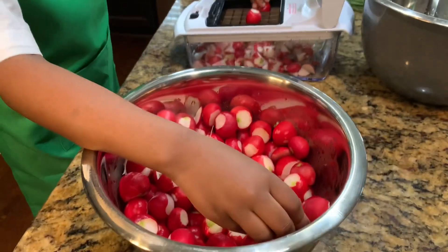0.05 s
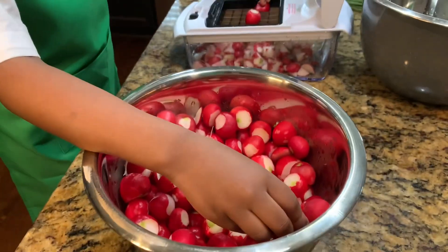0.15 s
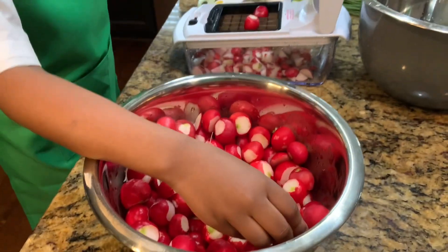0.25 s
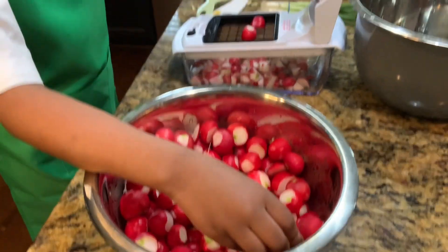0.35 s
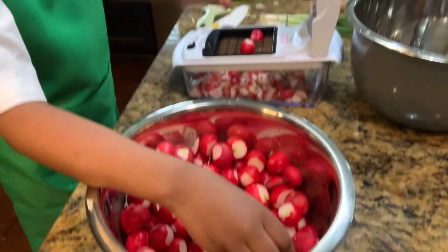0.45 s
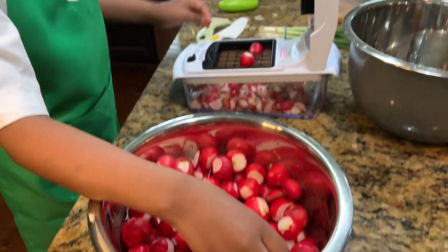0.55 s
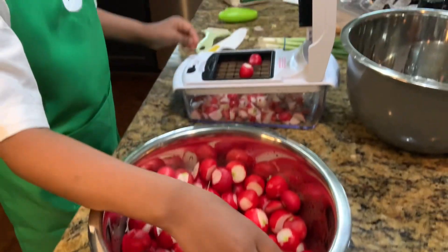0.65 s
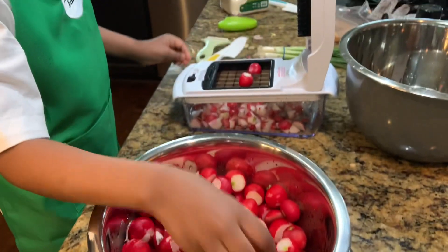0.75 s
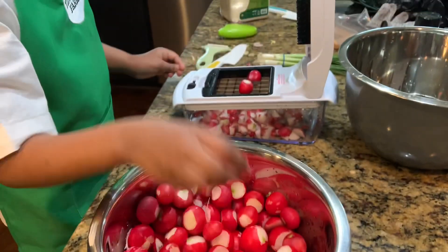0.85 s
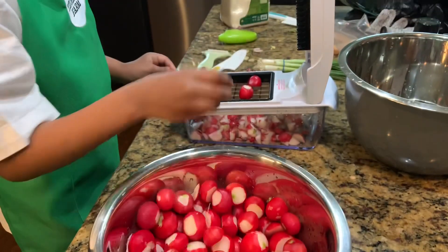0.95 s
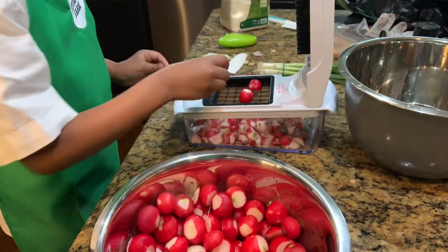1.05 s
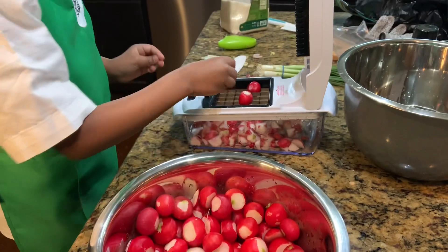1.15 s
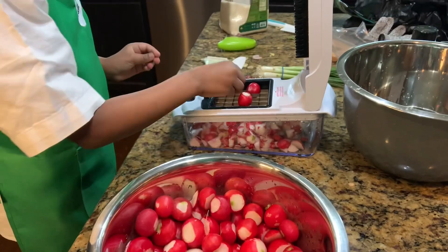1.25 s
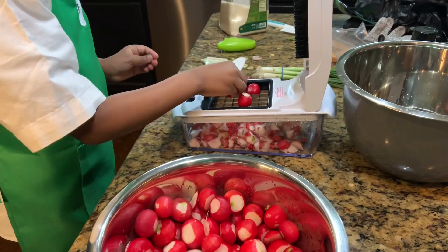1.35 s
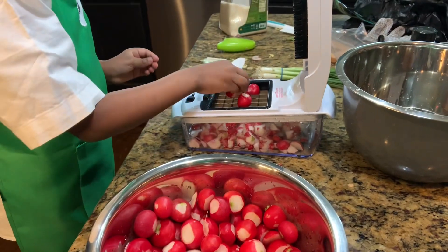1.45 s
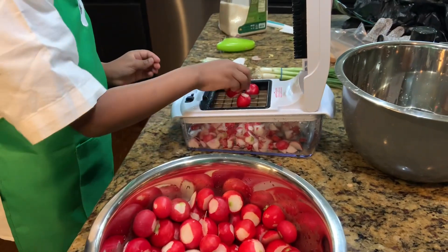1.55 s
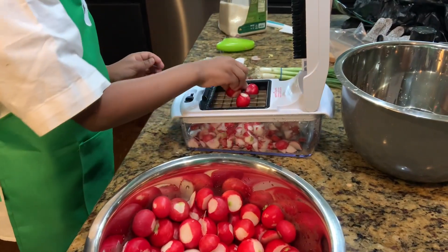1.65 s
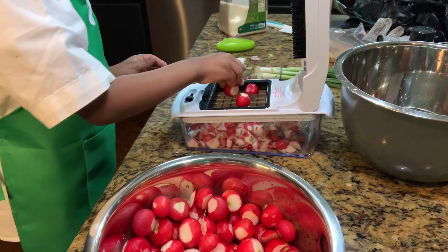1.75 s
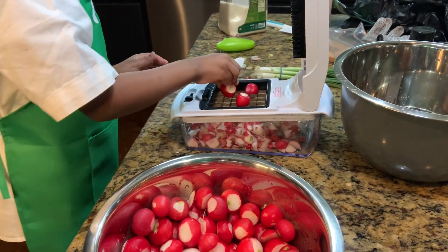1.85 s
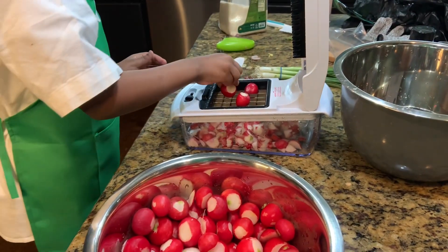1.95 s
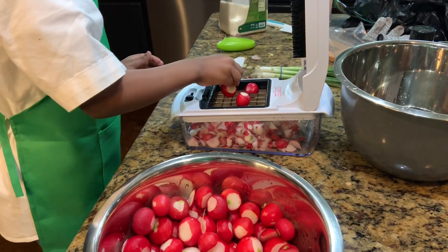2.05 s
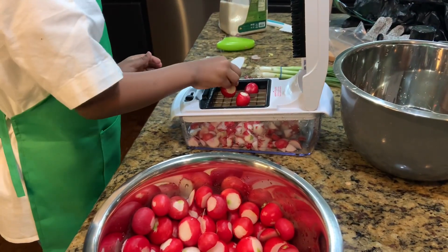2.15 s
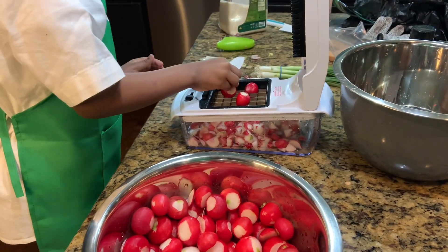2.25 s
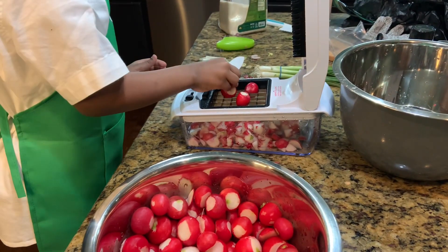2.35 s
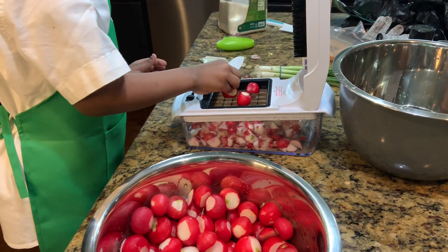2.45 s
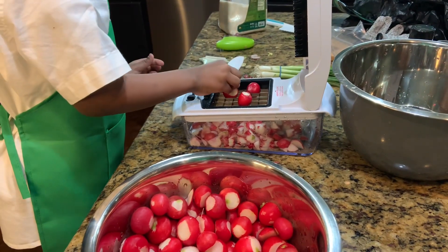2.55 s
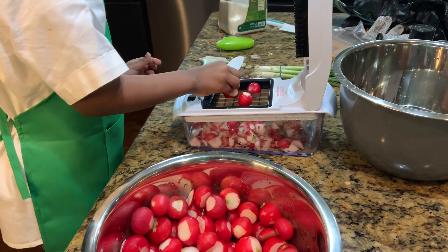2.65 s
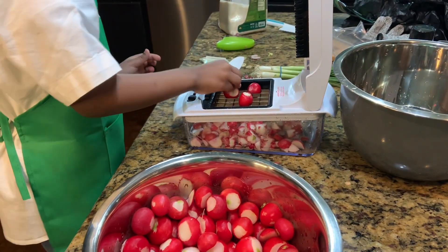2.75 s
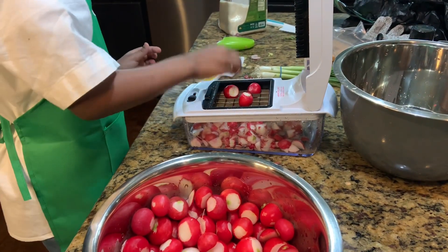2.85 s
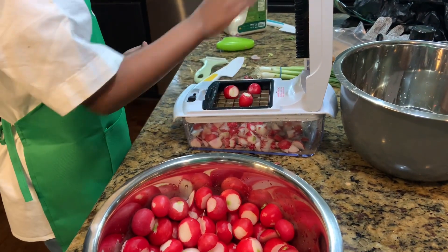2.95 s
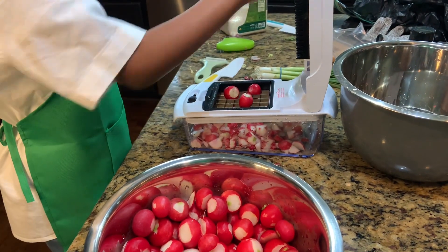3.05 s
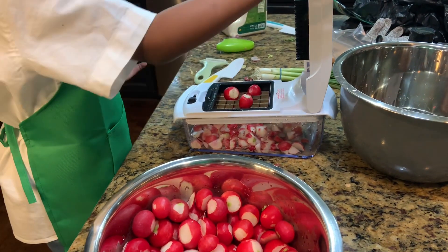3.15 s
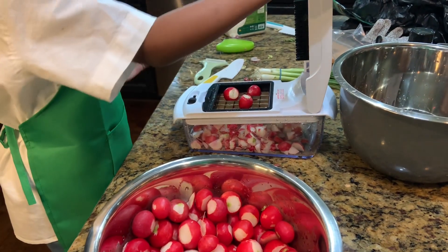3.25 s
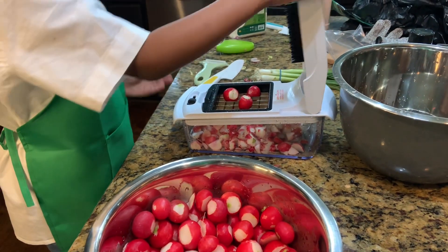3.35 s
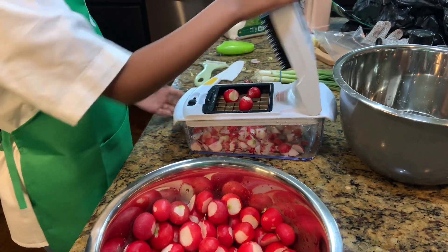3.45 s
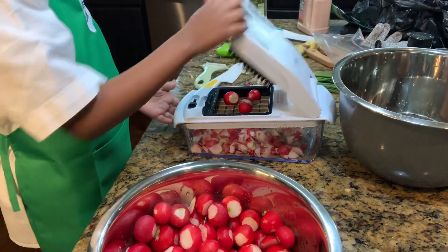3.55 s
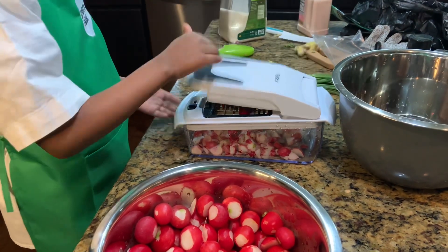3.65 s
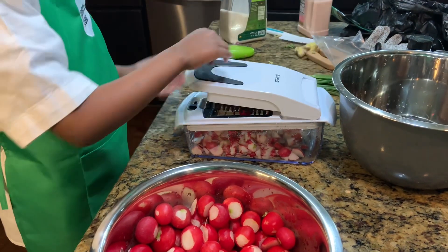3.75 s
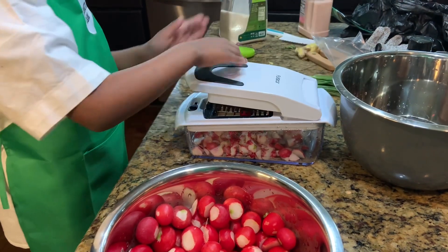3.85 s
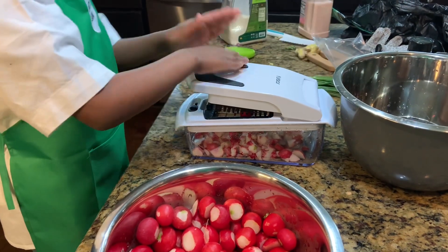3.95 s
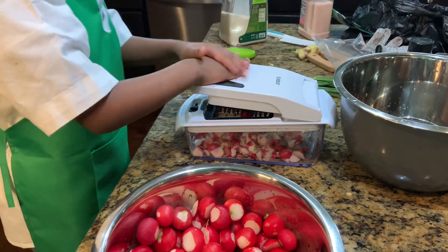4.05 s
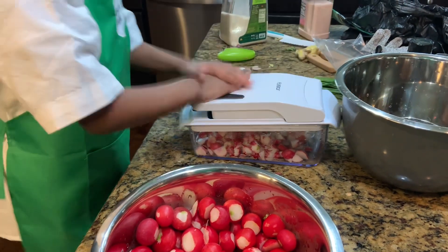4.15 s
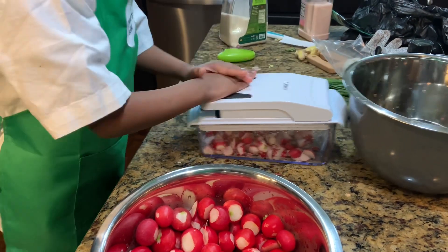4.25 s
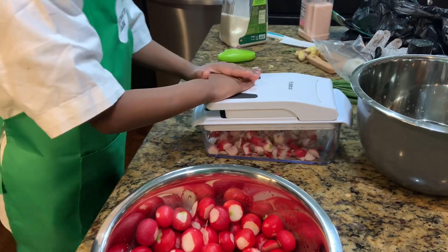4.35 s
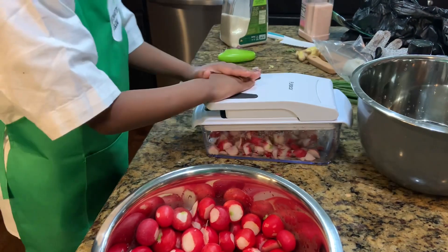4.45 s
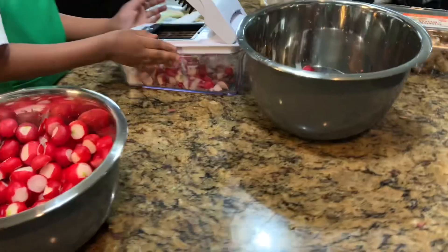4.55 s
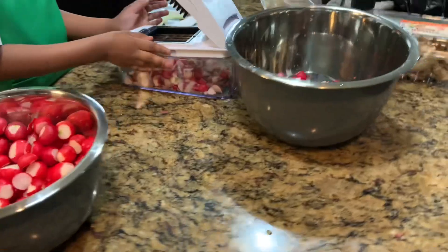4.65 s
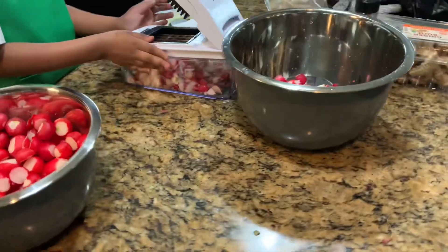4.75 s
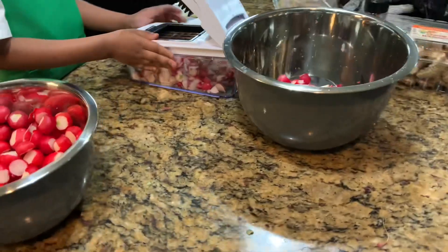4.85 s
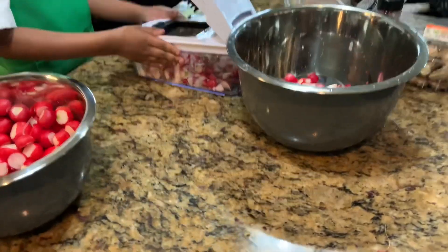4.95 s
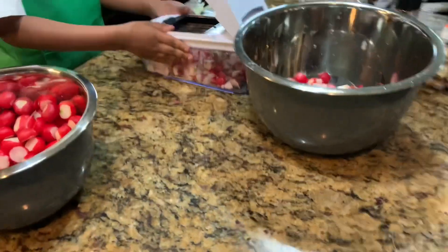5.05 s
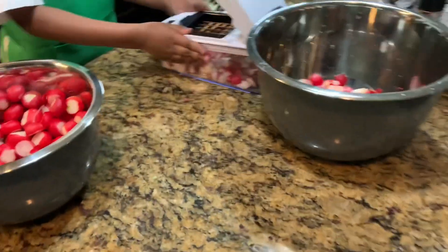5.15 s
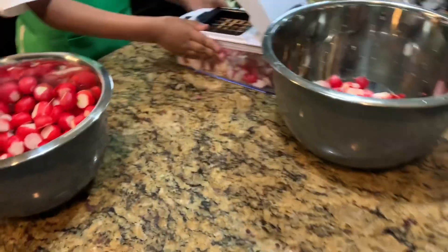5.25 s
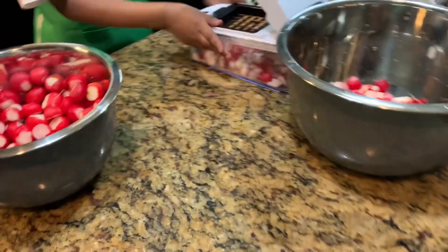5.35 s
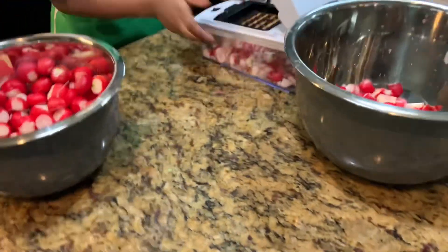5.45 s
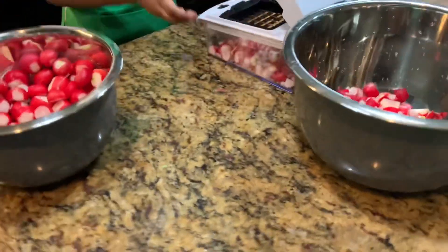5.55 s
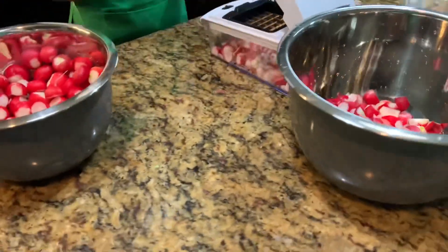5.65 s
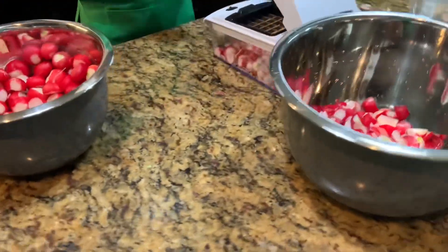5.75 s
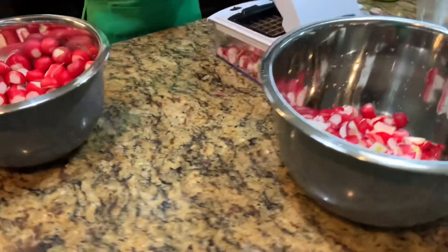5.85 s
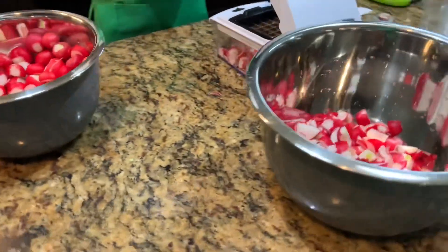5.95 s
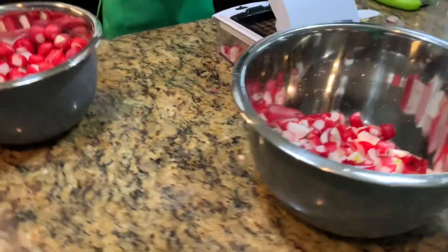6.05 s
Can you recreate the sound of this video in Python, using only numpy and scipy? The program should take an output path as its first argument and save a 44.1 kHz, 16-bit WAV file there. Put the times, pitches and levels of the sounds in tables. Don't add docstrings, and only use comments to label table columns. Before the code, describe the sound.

A quiet, hard-walled kitchen heard in close stereo, with a low, slightly unsteady fridge hum throughout. For the first 3.6 seconds there are only small sounds: sleeve rustle, faint fingernail ticks on a steel bowl near 0.7, a soft scrape over the blade grid, and dull radish taps around 1.3, 1.8, 2.1 and 3.2. At 3.66 the chopper's plastic lid drops with a hollow double clack. Light taps at 4.0 precede a palm landing at 4.11 and a sharp, cracking slam at 4.16 with a low counter thud; cut radish crackles and loose parts rattle. The sound cuts abruptly at 4.56 to the lid clattering open until 4.7. At 5.11 the box knocks loudly on stone, bounces and rocks in fading plastic rattles until 5.4. Soft rustle, a faint tap or two and hum remain to about 6.1.

```python
import sys
import numpy as np
from scipy import signal
from scipy.fft import rfft, irfft, next_fast_len
from scipy.io import wavfile
from scipy.ndimage import map_coordinates

SR = 44100
rng = np.random.default_rng(int(sys.argv[2]) if len(sys.argv) > 2 else 0)


def file_out(sig):
    cols = np.atleast_2d(sig).T
    lim = np.clip(cols, -1, 1)
    pcm = np.round(lim * 32767).astype(np.int16)
    wavfile.write(sys.argv[1], SR, pcm)


def makeup_ratio(level_db):
    decades = np.asarray(level_db, float) / 20
    return 10 ** decades


N = 268806
CUT_S = 4.561

# pitch_hz, width_hz, level_db
BOX = [(250, 120, -3), (430, 77, -0.5), (591, 100, -1.5), (780, 94, 0), (966, 99, -2.5), (1143, 81, -7),
       (1325, 50, -15), (1647, 58, -7), (1930, 174, -13)]
# pitch_hz, density_db (per Hz)
CRACK = [(500, -31), (1000, 2), (2000, -7), (4000, -3.5), (6500, -9.5), (9000, -7.5), (12000, -13.5),
         (16000, -13)]
# pitch_hz, likeness (-1 to 1)
ALIKE = [(60, 0.55), (130, 0.85), (290, 0.9), (640, 0.3), (1410, -0.034), (3100, 0.094), (6820, -0.27),
         (15000, 0.02)]


def unit(x):
    return x / np.sqrt(np.mean(x ** 2) + 1e-20)


def along(points, hz):
    f, v = np.transpose(points)
    return np.interp(np.log(hz + 1), np.log(f + 1), v)


def gains(tables):
    t = np.arange(N) / SR
    total = 0
    for table in tables:
        s, *columns = np.transpose(table)
        total = total + np.array([makeup_ratio(np.interp(t, s, db, -150, -150)) for db in columns])
    return total


def wobble(rate):
    knots = rng.standard_normal(int(N * rate / SR) + 4)
    return map_coordinates(knots, [np.arange(N) * rate / SR])


def filtered(x, response):
    m = next_fast_len(x.shape[-1] + 4096)
    spectrum = rfft(x, m) * response(np.fft.rfftfreq(m, 1 / SR))
    return irfft(spectrum, m)[..., :x.shape[-1]]


def modes(peaks):
    def response(f):
        total = 0
        for k, (centre, width, db) in enumerate(peaks):
            damping = 1j * f * width
            total = total + (-1) ** k * makeup_ratio(db) * damping / (centre * centre - f * f + damping)
        return total
    return response


def likeness_angle(hz):
    return np.arccos(np.clip(along(ALIKE, hz), -1, 1)) / 2


def diffuse(response, lumps=1):
    def spread(hz):
        angle = likeness_angle(hz)
        return response(hz) * np.array([np.cos(angle), np.sin(angle)])
    mid, side = filtered(lumps * rng.standard_normal((2, N)), spread)
    return unit(np.array([mid + side, mid - side]))


def room(x):
    # pitch_hz, t60_s
    wall_t60 = [(150, 0.82), (500, 0.57), (2000, 0.73), (6000, 0.49), (14000, 0.39)]
    hz, t, z = signal.stft(rng.standard_normal((2, SR // 5 * 2)), SR, nperseg=256)
    angle = likeness_angle(hz)[:, None]
    z = np.cos(angle) * z[0] + np.sin(angle) * z[1] * np.array([1, -1])[:, None, None]
    decay = makeup_ratio(-60 * t / along(wall_t60, hz)[:, None])
    tail = signal.istft(z * decay, SR, nperseg=256)[1]
    delayed = np.pad(x, ((0, 0), (200, 0)))
    return signal.fftconvolve(delayed, tail / np.linalg.norm(tail[0]), axes=1)


def contacts(rows, wet_db, knock_db):
    # pitch_hz, level_db
    shadow = [(2500, 0), (4200, -6.5), (5500, -4.5), (7000, 2)]
    out, t = np.zeros((2, N + 2 * SR)), np.arange(SR // 5) / SR
    for s, db, hz, crack_db, t60 in rows:
        t60 = max(t60, .005)
        ring = np.sin(2 * np.pi * hz * t) * makeup_ratio(-60 * t / t60) * (1 - np.exp(-t / 0.00054))

        struck = [(c, w, level + rng.normal(0, 1.1) - 2.5 * abs(np.log2(c / hz))) for c, w, level in BOX]
        knock = filtered(rng.standard_normal(len(t)) * makeup_ratio(-60 * t / (0.5 * t60)), modes(struck))

        edge_hz = 9000 * makeup_ratio(0.72 * crack_db)

        def crack_colour(f):
            colour_db = along(CRACK, f) + np.outer([1, 0], along(shadow, f))
            return makeup_ratio(colour_db) / (1 + 1j * f / edge_hz)

        crack = filtered(rng.standard_normal((2, len(t))) * makeup_ratio(-60 * t / 0.034), crack_colour)
        near = ring + makeup_ratio(knock_db) * knock / np.abs(knock).max()
        near = near + makeup_ratio(crack_db) * crack / np.abs(crack).max()
        near[1] = np.roll(near[1], 4)
        echo = room(near[1:, :SR // 12] - 0.27 * ring[:SR // 12])
        at = round(s * SR)
        out[:, at:at + len(t)] += makeup_ratio(db) * near
        out[:, at:at + echo.shape[1]] += makeup_ratio(db + wet_db) * echo
    return out[:, :N]


def swells(rows):
    swell_db, roundness = 25, 1.5
    out, t = np.zeros((len(rows[0]) - 3, N)), np.arange(N) / SR
    for t0, top, t1, db, *over_db in rows:
        end = min(t1, CUT_S) if top < CUT_S else t1
        span = slice(round(t0 * SR), round(end * SR))
        away = np.interp(t[span], [t0, top, t1], [1, 0, 1])
        layers_db = np.array([0, *over_db])[:, None]
        out[:, span] += makeup_ratio(db - swell_db * away ** roundness + layers_db)
    return out


def kitchen():
    # time_s, level_db
    hum = [(0.0, -59.5), (1.2, -59), (1.63, -63), (2.51, -60), (3.45, -60), (4.4, -58.5), (5.13, -67),
           (5.3, -60.5), (5.7, -68), (6.1, -65)]
    # pitch_hz, level_db
    fridge = [(120, 3), (167, -12.5), (335, -22.5), (505, -30.5)]
    # pitch_hz, density_db (per Hz)
    air = [(20, -17), (45, 7), (70, 6.5), (150, 1.5), (250, -7), (500, -16), (1000, -22.5), (2000, -31),
           (4000, -38.5), (8000, -40), (13000, -38), (16000, -50.5)]
    t, level = np.arange(N) / SR, gains([hum])[0]
    lines = 0
    for hz, db in fridge:
        unsteady = makeup_ratio(db + 0.91 * wobble(16))
        lines = lines + unsteady * np.sin(2 * np.pi * hz * t + 0.94 * wobble(1.3))
    drift_db = .9 * wobble(2.5) + 1.2 * wobble(11)
    return makeup_ratio(6.5) * level * lines + makeup_ratio(-58.0 + drift_db) * diffuse(lambda f: makeup_ratio(along(air, f)))


def rustle():
    # start_s, peak_s, end_s, hiss_db, body_over_hiss_db
    strokes = [(.1, .12, 0.17, -75, 2), (.66, .73, 0.82, -83, 10), (1.27, 1.3, 1.186, -70.5, 16),
               (1.3, 1.75, 2, -83.5, 3.5), (1.75, 1.81, 1.917, -72, 2), (2.03, 2.06, 2.2, -95.5, 30),
               (1.9, 2.45, 2.66, -74, 1), (2.75, 2.83, 2.82, -88, 22), (3.17, 3.19, 3.24, -80, 18),
               (3.28, 3.32, 2.4, -84, -3), (3.1, 3.45, 4.42, -78.5, 2), (3.56, 3.64, 3.3, -75, 6.5),
               (4.75, 5.03, 5.12, -76, 8), (5.2, 5.35, 5.7, -80, 25), (5.33, 5.37, 4.88, -58.5, 10),
               (5.35, 5.56, 5.62, -61.5, -6), (5.6, 5.73, 5.883, -67, -1.5), (5.75, 5.9, 6, -71, -0.5),
               (5.9, 6.07, 6.13, -75.5, 1)]
    # start_s, peak_s, end_s, level_db
    scrapes = [(.68, .73, 0.67, -67), (1.62, 1.82, 1.83, -72.5), (2.1, 2.38, 2.4, -79),
               (3.3, 3.46, 3.66, -85)]
    # pitch_hz, width_hz, level_db
    blades = [(2200, 110, 9), (3500, 360, -3), (4730, 220, -13), (6730, 290, -2.5)]
    # pitch_hz, density_db (per Hz)
    cloth = [(900, -18.5), (2200, 3), (2800, -4.5), (3500, -2), (5000, -5), (6500, -10), (9000, -3.5),
             (11000, -7.5), (15000, -10.5), (16500, -14)]
    hiss, body = swells(strokes)
    grain = makeup_ratio(1.8 * wobble(140))
    out = makeup_ratio(2.0) * hiss * diffuse(lambda f: makeup_ratio(along(cloth, f)), grain)
    out += swells(scrapes) * diffuse(modes(blades), grain)
    lumps = makeup_ratio(1.5 * wobble(40))
    handling = body + makeup_ratio(-75 + 2.5 * wobble(5))
    return out + makeup_ratio(0.5) * handling * diffuse(modes([(578, 350, 0), (1100, 620, 0)]), lumps)


def light_contacts():
    # start_s, peak_db, pitch_hz, crack_db
    taps = [(0.138, -39.5, 513, -27), (.767, -43, 205, -32), (1.262, -54, 464, -24),
            (1.293, -46.5, 482, -9), (1.829, -45, 490, -7.5), (2.054, -35, 630, -19),
            (2.126, -39.5, 510, -38), (2.746, -47, 1030, -15), (3.189, -40, 547, -38),
            (3.282, -49, 540, -24), (4.004, -29.5, 505, -21.5), (4.014, -33.5, 480, -22.5),
            (4.025, -36, 400, -25), (4.042, -39.5, 360, -23), (4.781, -53.5, 404, -21.5),
            (4.818, -51.5, 907, -16.5), (5.074, -35, 700, -24), (5.567, -46, 451, -8), (5.75, -53, 666, 4)]
    # start_s, peak_db, pitch_hz
    ticks = [(.700, -55, 1300), (0.709, -57, 1310), (0.729, -47.5, 1250), (0.832, -60.5, 1250)]
    light = [(*row, .028) for row in taps]
    light += [(*row, -4.5, 0.039) for row in ticks]
    return contacts(light, wet_db=-6.5, knock_db=-5.0)


def counter():
    # start_s, level_db
    thuds = [(.767, -39), (3.666, -17.5), (3.72, -24), (4.04, -38.5), (4.112, -29.5), (4.159, -9.5),
             (4.30, -30), (4.359, -26), (4.44, -28.5), (4.596, -28), (5.073, -30), (5.112, -18),
             (5.137, -27.5), (5.212, -46), (5.354, -33.5), (5.75, -50.5)]
    # pitch_hz, t60_s
    slab_modes = [(70, 0.17), (98, 0.033)]
    out, t = np.zeros(N + SR), np.arange(SR // 5) / SR
    late = (1 - np.exp(-t / .017)) ** 3
    shake = sum(np.sin(2 * np.pi * hz * t) * makeup_ratio(-60 * t / t60) for hz, t60 in slab_modes) * late
    for s, db in thuds:
        out[round(s * SR):][:len(t)] += makeup_ratio(db + 9) * shake
    return out[:N]


def presses():
    # start_s, end_s, final_db, rise_db
    loads = [
        (3.643, 3.658, -40.5, 30),
        (4.125, 4.155, -20, 29.5),
        (4.572, 4.593, -39, 8),
        (5.068, 5.112, -31.5, 32.5),
        (5.349, 5.37, -51, 1),
    ]
    ramps = [[(t0, db - rise_db), (t1, db), (t1 + 0.0066, db - 23)] for t0, t1, db, rise_db in loads]
    grit = makeup_ratio(1.7 * wobble(500))
    crackle = diffuse(lambda f: makeup_ratio(along(CRACK, f)), grit)
    return gains(ramps)[0] * (crackle + makeup_ratio(-3) * diffuse(modes(BOX), grit))


def blows():
    # start_s, peak_db, pitch_hz, crack_db, ring_t60_s
    lid = [(3.662, -12, 978, -8, 0.025), (3.663, -19.5, 2160, -4.5, 0.025), (3.665, -9, 427, -5.5, 0.019),
           (3.667, -15, 334, -12, 0.026), (3.673, -16, 395, -10, 0.065), (3.70, -30, 154, -4, 0.047),
           (3.722, -20, 399, -15, 0.034), (3.762, -30, 165, -15, 0.021), (3.818, -39.5, 392.5, -25.5, 0.27)]
    slam = [(4.113, -19.5, 580, -13, 0.052), (4.157, -19.5, 6270, 14, 0.038), (4.160, -8, 780, 8, 0.023),
            (4.163, -16, 623, 4.5, 0.022), (4.164, -11, 247, -3, 0.032), (4.168, -19, 130, -9.5, 0.1),
            (4.205, -20.5, 780, -10.5, 0.03)]
    opening = [(4.564, -32, 452, -0.5, 0.07), (4.579, -29.5, 901, -9, 0.15),
               (4.595, -20.5, 1100, -4.5, 0.026), (4.599, -20, 450, -11, 0.031),
               (4.613, -25, 915, -7, 0.052), (4.633, -30, 438, -4, 0.05), (4.67, -39, 497, -15, .06),
               (4.73, -38.5, 439.4, -22.5, 0.065)]
    stone_knock = [(5.107, -10, 430, -24.5, 0.039), (5.110, -8, 450, -15, 0.047),
                   (5.113, -5, 525, -2.5, 0.02), (5.112, -19, 770, -24, 0.11), (5.127, -21, 794, 2, 0.065),
                   (5.134, -20.5, 98.5, -21.5, 0.066), (5.141, -13.5, 415, -2.5, 0.05),
                   (5.159, -13, 467, -1.5, .045)]
    # start_s, peak_db, pitch_hz
    rocks = [(5.150, -32, 780), (5.182, -22.5, 459), (5.212, -25, 460), (5.23, -32, 815), (5.25, -36, 616),
             (5.272, -35.5, 476), (5.30, -40, 690), (5.325, -37.5, 431), (5.35, -30, 476),
             (5.376, -28, 442)]
    crack_db, ring_cycles = -11, 35
    rocking = [(s, db, hz, crack_db, ring_cycles / hz) for s, db, hz in rocks]
    return contacts(lid + slam + opening + stone_knock + rocking, wet_db=-7, knock_db=-5.5)


def tumble():
    # start_s, peak_s, end_s, walls_db, hollow_over_walls_db
    loose = [(3.68, 3.9, 4.4, -62, -1), (4.1, 4.21, 4, -50, -8.5), (4.05, 4.44, 4.88, -39.5, -7),
             (4.55, 4.59, 4.91, -46, -1), (4.7, 5.05, 5.12, -63, -0.5), (5.12, 5.24, 5.24, -48, -2.5),
             (5.2, 5.52, 5.82, -62.5, 5.5)]
    # start_s, peak_s, end_s, level_db
    pieces = [(4.09, 4.12, 4.25, -50.5), (4.1, 4.3, 8, -49), (4.15, 4.42, 4.97, -45),
              (4.55, 4.6, 4.792, -47), (4.6, 4.8, 5.28, -68), (5.11, 5.138, 5.21, -39),
              (5.15, 5.2, 4.8, -58), (5.3, 5.5, 5.88, -62.5), (3.7, 3.85, 3, -73)]
    # start_s, peak_s, end_s, level_db
    leaning = [(3.66, 3.7, 3.73, -40), (4.0, 4.06, 4.12, -59.5), (4.2, 4.37, 4.47, -44),
               (4.56, 4.59, 4.74, -46), (5.1, 5.2, 5.3, -56.5), (5.28, 5.34, 5.4, -50)]
    # pitch_hz, density_db (per Hz)
    crunch_colour = [(500, -32), (1100, 2.5), (2000, -2), (4000, -3), (7000, -11.5), (9000, -12.5),
                     (12000, -28.5), (16000, -35.5)]
    walls, hollow = swells(loose)
    crunch, slab = swells(pieces)[0], swells(leaning)[0]
    bursts = 3 * wobble(90)
    out = makeup_ratio(-2.5) * hollow * diffuse(modes(BOX[:2]), makeup_ratio(bursts))
    out += makeup_ratio(-2.0) * walls * diffuse(modes(BOX[2:]), makeup_ratio(bursts))
    crumbs = makeup_ratio(.6 * bursts + 0.83 * wobble(400))
    out += makeup_ratio(3.5) * crunch * diffuse(lambda f: makeup_ratio(along(crunch_colour, f)), crumbs)
    return out + makeup_ratio(6.0) * slab * diffuse(modes([(66, 54, 0)]))


def scene():
    return kitchen() + rustle() + light_contacts() + counter() + presses() + blows() + tumble()


def band_limit(x):
    return signal.sosfilt(signal.butter(12, 16650, fs=SR, output="sos"), x)


def record(dry):
    def share(hz):
        return np.clip((hz - 3500) / 3800, 0, 1)

    def turned(hz):
        return share(hz) * np.exp(2j * np.pi * (hz - SR / 4) * 9 / SR)

    right = filtered(dry[1], lambda hz: np.sqrt(1 - share(hz) ** 2)) + filtered(dry[0], turned)

    left_s = CUT_S - np.arange(N) / SR
    fade_out, fade_in = np.clip(left_s / 0.096, .03, 1), np.clip(-left_s / 0.0031, .03, 1)
    pair = np.where(left_s > 0, fade_out, fade_in) * np.array([dry[0], right])
    pair = pair / (1 + np.abs(pair / .98) ** 4) ** (1 / 4)

    def band(hz):
        top = makeup_ratio(-35 * np.clip((hz - 15800) / 400, 0, 1))
        return top * (1j * hz / (48 + 1j * hz)) ** 2

    return band_limit(filtered(pair, band))


dry = scene()
out = record(dry)
file_out(out)
```